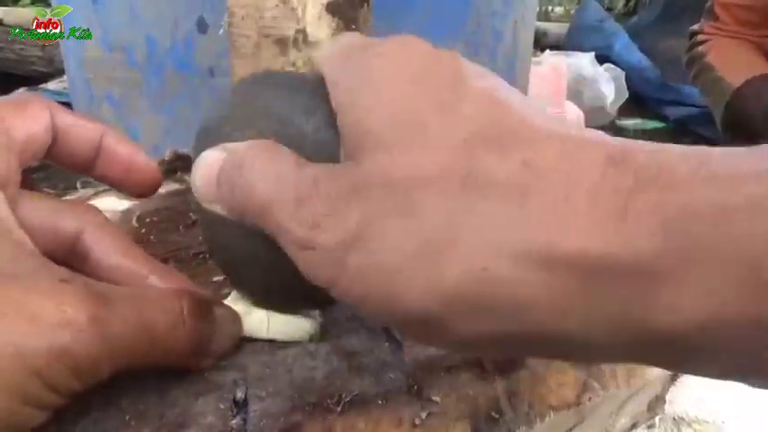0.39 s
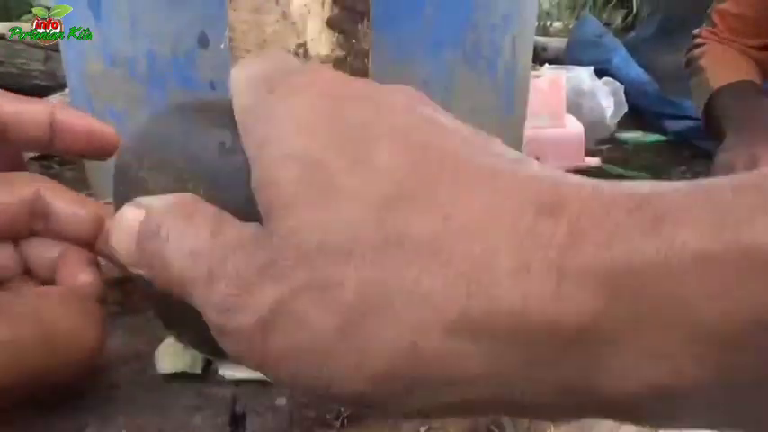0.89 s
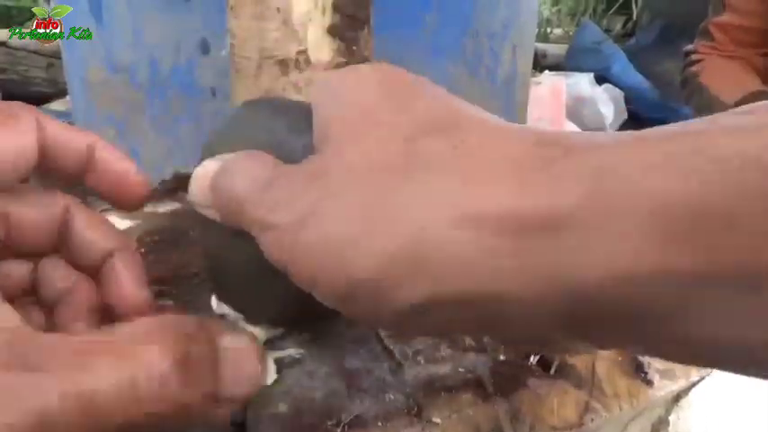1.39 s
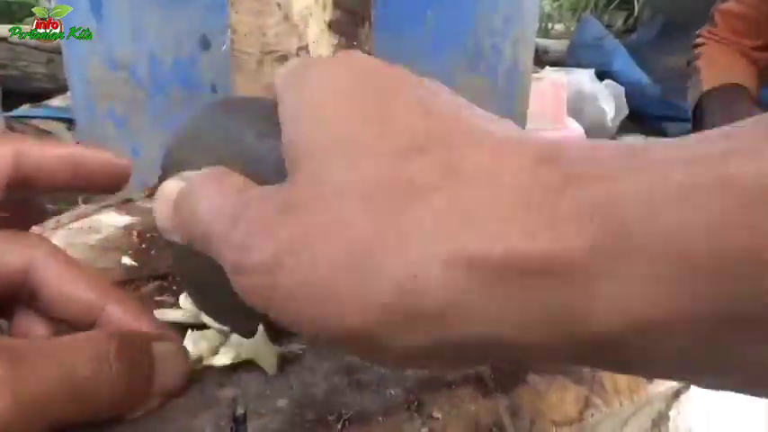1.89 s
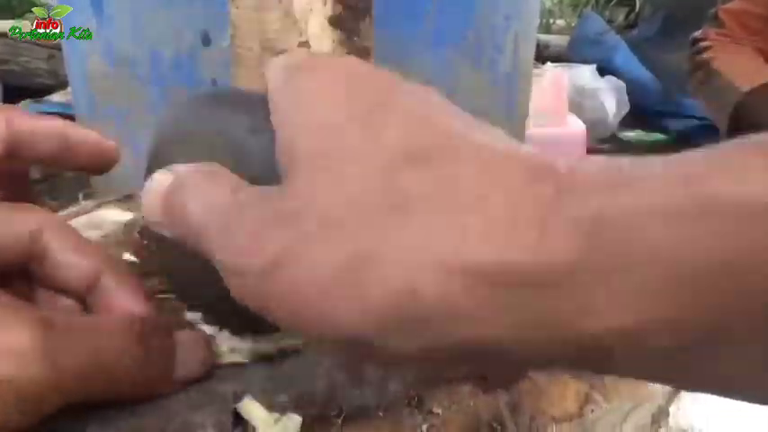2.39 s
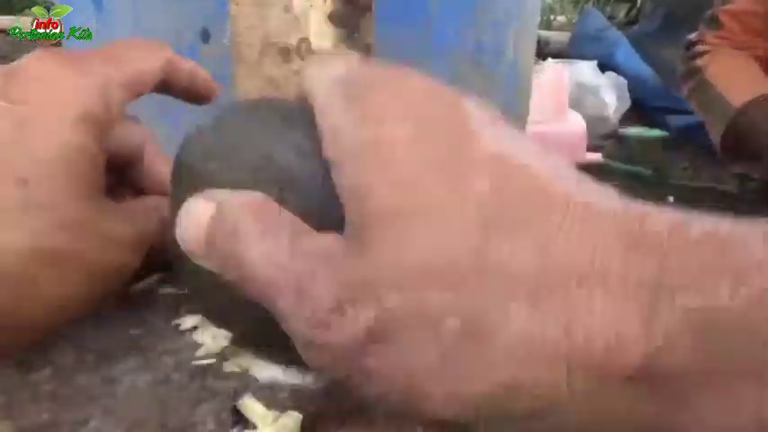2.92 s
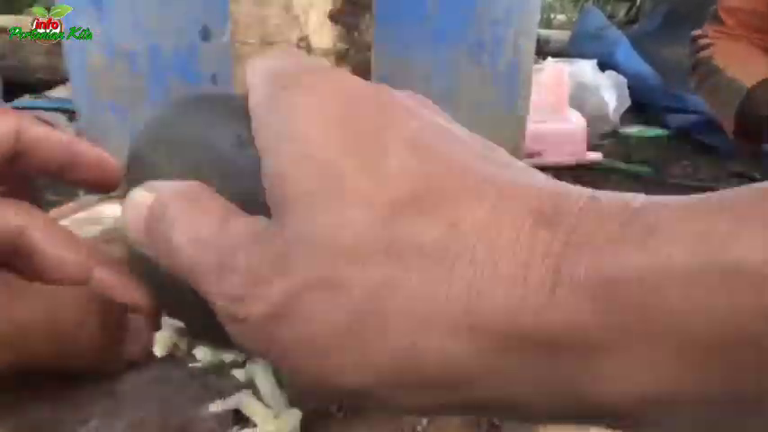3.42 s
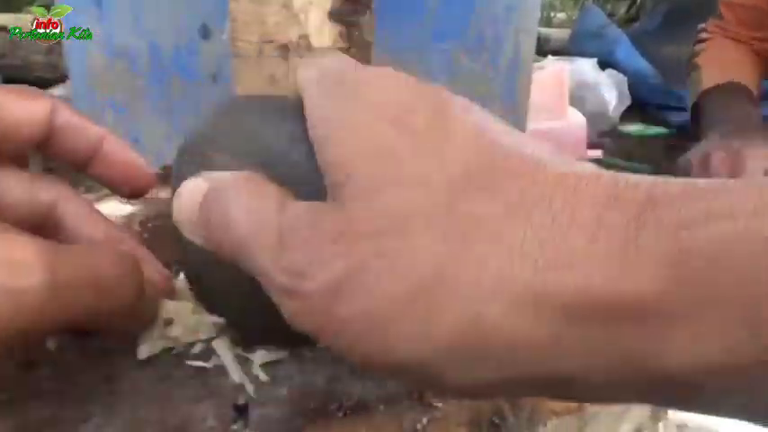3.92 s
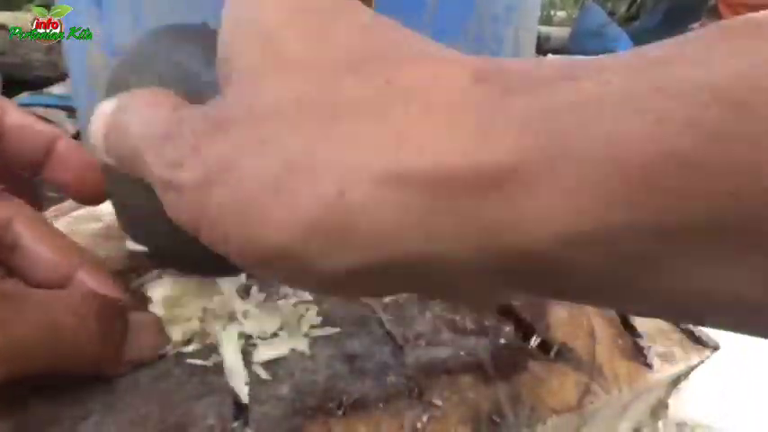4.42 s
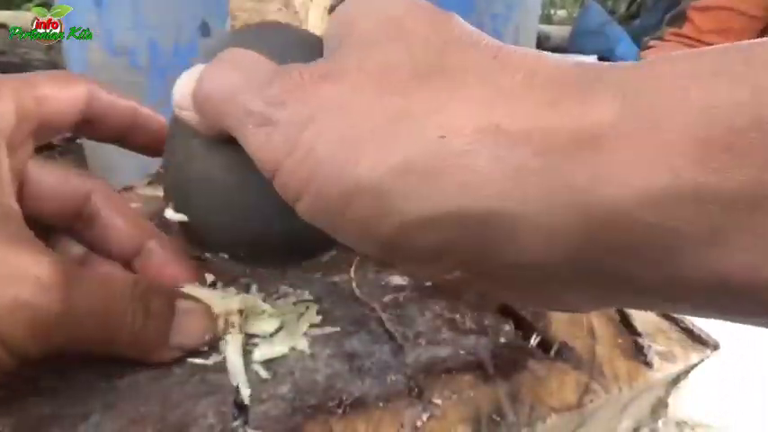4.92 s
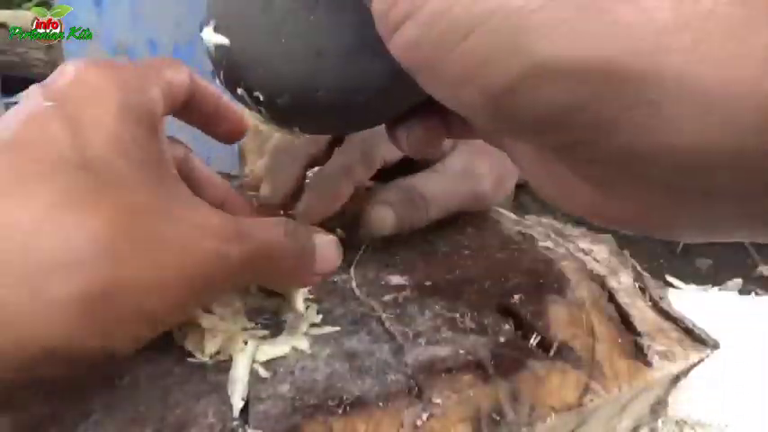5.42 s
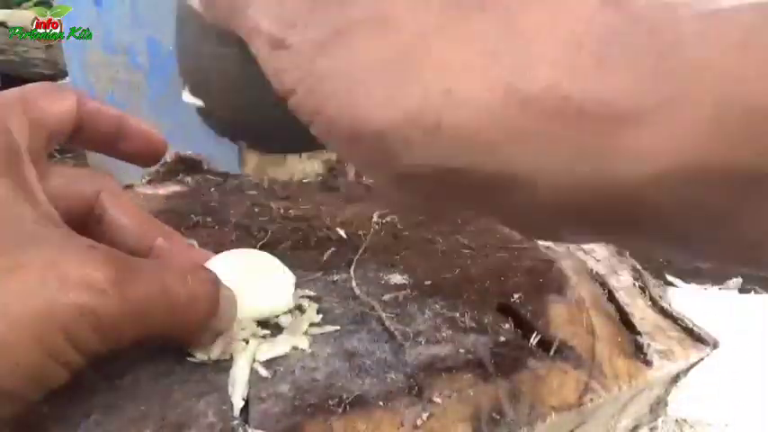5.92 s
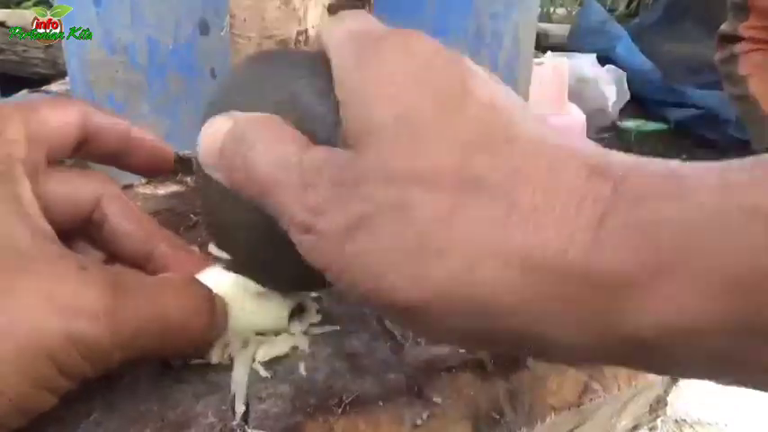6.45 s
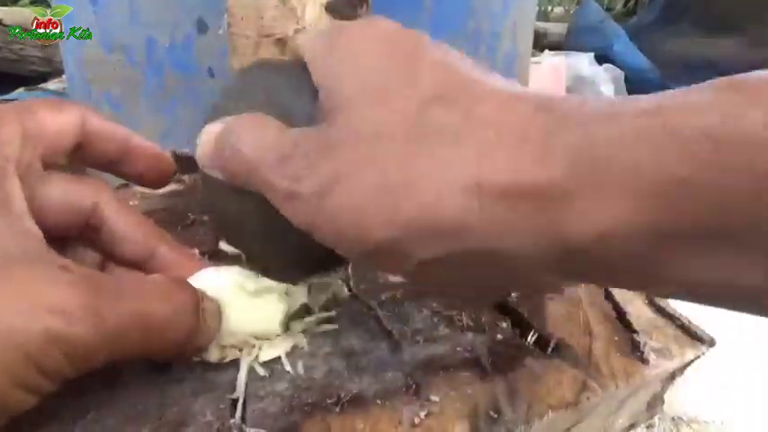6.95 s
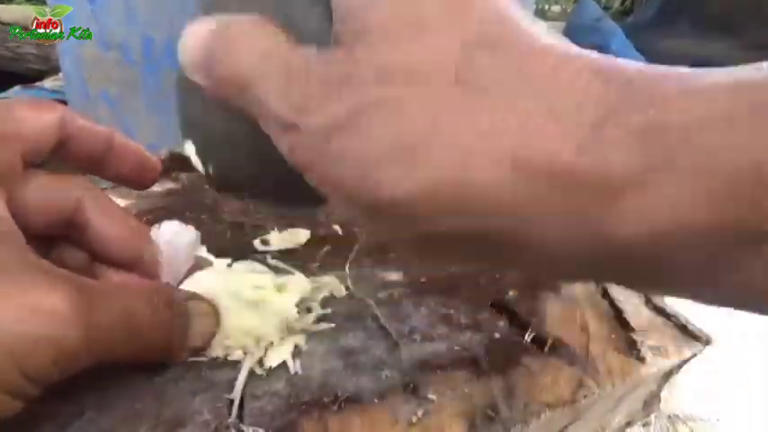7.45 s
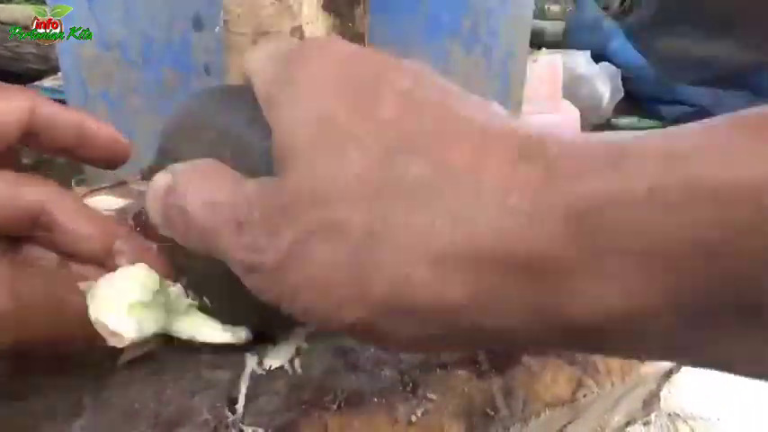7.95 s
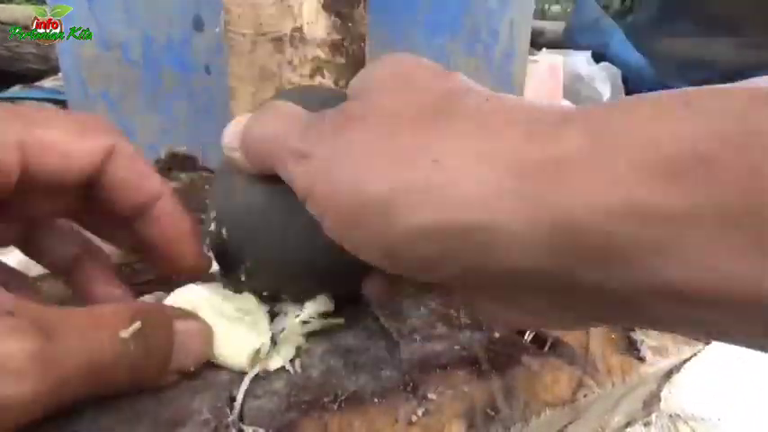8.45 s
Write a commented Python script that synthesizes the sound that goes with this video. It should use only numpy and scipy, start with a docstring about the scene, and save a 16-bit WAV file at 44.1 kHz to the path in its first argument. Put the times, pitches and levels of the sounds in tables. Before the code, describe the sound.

Quick, close stone blows crush garlic cloves on hollow wood, crisp and juicy, with sticky crackles between hits and soft open-air hiss behind.

```python
"""Wet pulp crackles over outdoor hiss and a far wavering hum, then a hand stone pounds garlic on a log.
Each blow is a short bright crunch, dense noise under a swelling envelope, with a slow shudder of the ground.
Knocks of stone on wood are decaying modes; between blows, pulp smears as resonated grains and crackles.
A few faint bird whistles glide in pitch. The level drops out once briefly, and the loudest blows overload."""
import sys
import numpy as np
from scipy import signal
from scipy.fft import rfft, irfft, next_fast_len
from scipy.io import wavfile

SR = 44100
rng = np.random.default_rng(int(sys.argv[2]) if len(sys.argv) > 2 else 0)


def ratio_of_db(decibels):
    """Turn decibels (scalar or array-like) into linear amplitude factors; 0 dB maps to 1."""
    return 10 ** (np.asarray(decibels, float) / 20)


def store_wav(level_fs):
    """Save 16-bit WAV to argv[1]."""
    pcm = np.round(np.clip(np.atleast_2d(level_fs), -1, 1) * 32767)
    wavfile.write(sys.argv[1], SR, pcm.T.astype(np.int16))


N = 378819

# blows on the garlic: peak t/s, crunch level/dB, crush time between -11 dB points/ms,
# relative dullness/dB, drive of the ground shake/dB
BLOWS = [(0.1731, 0, 1.8, -8.5, -33), (.3991, -6, 7.6, -7.5, -25.5), (.574, -0.5, 4.7, -9, -31),
         (0.701, -3.5, 5.5, -7.5, -31), (0.8384, 1, 4.2, -7.5, -29), (0.9778, -2, 4.8, -15, -31.5),
         (1.1388, -10, 4.6, -16, -30.5), (1.275, -6, 5.3, -10.5, -26.5), (1.4126, -6, 6.1, -9.5, -30),
         (1.689, -38, 8, -6, -31.5), (1.8186, 0.5, 2.6, -10.5, -30), (1.944, 1, 2.9, -9.5, -28),
         (2.0767, -3, 3.9, -23, -36), (2.2019, -7, 6, -10, -31.5), (2.477, -17.5, 11, -8, -35),
         (2.604, -19, 5.2, -11.5, -33), (2.716, -32.5, 5.3, -10, -32), (2.8149, -3.5, 4.7, -24, -30),
         (3.0099, -17, 6.1, -13, -30.5), (3.19, -1, 2.7, -19, -29.5), (3.3423, -4.5, 4.8, -15.5, -33.5),
         (3.5069, -8.5, 6.4, -15, -31), (3.6635, -2, 3.7, -30, -34.5), (4.0027, -23, 4.6, -10, -29.5),
         (4.1564, -24.5, 3.6, -8.5, -32.5), (4.2938, -1, 3.4, -17, -32), (4.427, -8.5, 5, -10.5, -28),
         (4.5602, -2, 6.1, -12.5, -36), (4.7074, -15, 7.2, -13.5, -28.5), (5.1031, -9.5, 6.6, -13, -36),
         (5.2144, 1.5, 2.96, -23, -36), (5.9078, -19, 4.5, -4, -31.5), (6.0524, -17, 7.1, -7, -26.5),
         (6.2106, 1, 4.9, -5, -25.5), (6.3538, -13, 7.6, -4, -25), (6.503, 2, 8.7, -5.5, -23),
         (6.657, -10.5, 8, -3.5, -25.5), (6.813, -14, 4.1, -9, -30), (6.9865, 2, 3.2, -6, -37),
         (7.1265, -9, 5.5, -12, -33), (7.311, -14.5, 6.7, -3, -31.5), (7.4577, -18, 2.1, -10, -29.5),
         (7.6057, -5.5, 4.3, -4, -27.5), (7.75, -4, 5.8, -4, -27.5), (8.013, -12, 16, -3.5, -27.5),
         (8.3825, -17.5, 8, -11, -33)]
# spectrum of crushed flesh: f/Hz, relative level/dB
FLESH_SPECTRUM = [(290, -45), (500, -27.5), (1260, -18), (1800, -22.5), (2740, -17), (4210, -10),
                  (6070, -4), (7100, -1), (8990, 2.5), (10700, 0), (11400, 11), (14800, -76), (22000, -120)]


def curve(rows):
    """Linear interpolation in time: the columns of a table, sample by sample."""
    s, *columns = np.transpose(rows)
    return [np.interp(np.arange(N) / SR, s, column) for column in columns]


def at_hz(points, hz):
    """Interpolation of a spectrum on a logarithmic frequency axis."""
    point_hz, value = np.transpose(points)
    return np.interp(np.log(hz + 1), np.log(point_hz), value)


def rms_one(x):
    """Normalisation of the mean power: x scaled to rms 1."""
    return x / np.sqrt(np.mean(x ** 2) + 1e-20)


def coloured(x, spectrum):
    """Zero-phase filtering: the spectrum of x is multiplied by a given magnitude."""
    size = next_fast_len(N)
    gain = ratio_of_db(at_hz(spectrum, np.fft.rfftfreq(size, 1 / SR)))
    return irfft(rfft(x, size) * gain, size)[..., :N]


def drift(rate):
    """Slow random fluctuation, rms 1: noise through two equal low-pass poles at rate Hz."""
    r = np.exp(-80 * np.pi * rate / SR)   # one step spans 40 samples
    noise = rng.standard_normal(N // 40 + 2002)
    slow = signal.lfilter([1], [1, -2 * r, r * r], noise)[2000:]   # start-up left out
    return np.interp(np.arange(N) / 40, np.arange(len(slow)), rms_one(slow))


def ring(force, modes):
    """Modal superposition: a force excites exponentially decaying resonances (f/Hz, gain/dB, T60/s)."""
    out = np.zeros(len(force))
    for hz, gain_db, t60 in modes:
        r = ratio_of_db(-60 / (t60 * SR))   # decay per sample
        w = 2 * np.pi * hz / SR
        poles = [1, -2 * r * np.cos(w), r * r]
        out += ratio_of_db(gain_db) * signal.lfilter([0, np.sin(w)], poles, force + 1e-18)
    return out


def crunches(sharp=1.76, tail_db=-21.5, tail_s=0.0077, split_hz=4000):
    """Fracture noise: dense cracks swell as the clove gives way and fade once it is flat; fibres snap singly."""
    # single fibres snapping around the blows: t/s, level/dB
    snaps = [(0.0572, -27), (0.166, -22), (0.1807, -23), (0.5808, -17), (.8622, -31), (1.1593, -27),
             (1.318, -23.5), (1.406, -19), (3.027, -23), (3.169, -18), (3.1937, -20), (3.3647, -21.5),
             (3.391, -23), (3.8001, -26.5), (3.8755, -27.5), (3.8915, -21), (4.187, -27), (4.439, -17),
             (4.58, -15), (4.6142, -23), (5.11, -28), (5.1414, -22.5), (5.955, -28), (6.0489, -19),
             (6.083, -24.5), (6.3508, -15), (6.377, -26), (6.5158, -15), (6.5644, -25), (6.5717, -24),
             (6.6644, -17), (6.6725, -17), (6.713, -27), (6.982, -10), (7.034, -24.5), (7.147, -31),
             (7.194, -16), (7.21, -31), (7.6004, -8.5), (7.6505, -23), (7.74, -23), (7.81, -27.5),
             (8.003, -21), (8.0155, -5), (8.14, -31)]
    snap_ms, snap_dull_db = 2.2, -9
    rise_share = 0.51   # of the crush time, before the peak

    cracks = rng.standard_normal(N) * ratio_of_db(4.16 * rng.exponential(1, N))
    noise = rms_one(coloured(cracks, FLESH_SPECTRUM))
    low = signal.sosfilt(signal.butter(2, split_hz, fs=SR, output="sos"), noise)
    high = noise - low
    out = np.zeros(N)
    offset = np.arange(-1300, 2600)
    t = offset / SR
    events = [row[:4] for row in BLOWS]
    events += [(s, db, snap_ms, snap_dull_db) for s, db in snaps]
    for s, level_db, crush_ms, dull_db in events:
        width = np.where(t < 0, rise_share, 1 - rise_share) * crush_ms / 1000
        shape = ratio_of_db(-11 * np.abs(t / width) ** sharp)
        shape += ratio_of_db(tail_db) * np.exp(-np.abs(t) / tail_s) * (t > 0)   # juice keeps fizzing
        at = np.clip(round(s * SR) + offset, 0, N - 1)
        tilt_db = dull_db / 2 + 8.0   # a dull crunch has more below the split
        burst = ratio_of_db(tilt_db) * low[at] + ratio_of_db(-tilt_db) * high[at]
        burst /= np.sqrt(np.sum((burst * shape) ** 2) / np.sum(shape ** 2))
        out[at] += ratio_of_db(level_db) * shape * burst
    return out


def knocks():
    """Impact excitation: the slope of a half-sine push rings the damped struck spot and the hollow log."""
    # stone reaching the wood: t/s, push level/dB, log ring relative to the push/dB
    wood_hits = [(.173, -2, -6), (1.278, -28, -30), (1.4121, -13, -28), (1.689, -35.5, -26),
                 (1.82, -4, -25), (1.9449, -6.5, -19), (2.079, -23.5, -39), (2.8139, -2.5, -12),
                 (3.0104, -27, -21), (3.1904, -6, -12.5), (3.665, -7.5, -24.5), (5.2154, -10, -39),
                 (6.2106, -18.5, -28), (6.988, -2, -29.5), (7.1272, -8, -25.5), (8.023, -18.5, -14),
                 (8.3864, -23, -8)]
    # stone skidding on the wood: t/s, level/dB
    skids = [(2.7116, -24), (3.9998, -22.5), (6.8091, -11.5)]
    # the touches within every skid: delay t/s, relative level/dB, log ring relative to the push/dB
    touches = [(0, -1.2, -12), (.0024, -1.5, -13.5), (.0052, -1, -8.5), (.0106, -0.38, -9.5)]
    # damped spot under the stone: f/Hz, gain/dB, T60/s
    struck_spot = [(331, 5.5, 0.017), (629, 9, 0.0079), (1510, 4, 0.012), (160, -29, 0.012)]
    # modes of the hollow log: f/Hz, gain/dB, T60/s
    log_modes = [(417, 7.5, 0.063), (557, 8.5, 0.026), (702, 7, 0.047), (743.5, 7, 0.05), (1042, 3, 0.039),
                 (1240, -9, 0.077), (1443, 9, 0.036), (1750, -17, 0.059), (2090, 1.5, 0.027),
                 (333, -12, 0.17)]
    soft_push_db, soft_ring_db = -28.5, -25.5   # push through the flesh, below the crunch; its log ring
    contact_ms = 0.94
    mode_spread_db = 1.5   # chance per knock and mode
    chatter_db, chatter_s = -27, .007   # ragged contact after the touch

    skid_hits = [(s + lag, db + touch_db, ring_db) for s, db in skids for lag, touch_db, ring_db in touches]
    soft_hits = [(s, db + soft_push_db, soft_ring_db) for s, db, *_ in BLOWS]
    s, level_db, ring_db = np.transpose(wood_hits + skid_hits + soft_hits)
    at = np.round(s * SR).astype(int)

    push = np.sin(np.pi * np.minimum(np.arange(200) / SR * 1000 / contact_ms, 1))
    push_slope = np.diff(push / push.sum(), prepend=0) * SR / 4000

    spot_force = np.zeros(N)
    np.add.at(spot_force, at, ratio_of_db(level_db))
    chance = rng.standard_normal((len(s), len(log_modes)))
    grit = rng.standard_normal(N)
    log_ring = np.zeros(N)
    for mode, own in zip(log_modes, chance.T):
        force = np.zeros(N)
        np.add.at(force, at, ratio_of_db(level_db + ring_db + mode_spread_db * own))
        decay = [1, -np.exp(-1 / (chatter_s * SR))]
        chatter = signal.lfilter([ratio_of_db(chatter_db)], decay, force + 1e-18) * grit
        log_ring += ring(force + chatter, [mode])
    return signal.lfilter(push_slope, 1, ring(spot_force, struck_spot) + log_ring)


def thumps():
    """Low-frequency modal response: a smoothed downward impulse per blow makes the ground shudder."""
    # modes of the ground: f/Hz, gain/dB, T60/s
    ground = [(71, 5.5, 0.14), (45.2, -26, 0.12), (138, -3.5, 0.04)]
    lag_s, rise_s = -0.0011, 0.0013   # from the crunch peak; build-up time constant
    force = np.zeros(N)
    for s, *_, shake_db in BLOWS:
        force[round((s + lag_s) * SR)] = -ratio_of_db(shake_db)   # starts with a drop in pressure
    r = np.exp(-1 / (rise_s * SR))
    smooth = signal.lfilter([(1 - r) ** 2], [1, -2 * r, r * r], force + 1e-18)
    return ring(smooth, ground)


def smears(per_s=6900.0):
    """Resonated grain noise: wet grains fizz as the stone slides and ring in an air pocket."""
    # pulp smeared under the stone: start t/s, length/s, fizz level/dB, pocket f/Hz, pocket relative to fizz/dB
    slides = [(0.795, 0.053, -38, 5000, -4), (1.685, 0.059, -41, 5030, -3), (3.083, 0.029, -45, 5340, -2),
              (3.116, 0.038, -34.5, 2400, -11), (3.873, 0.043, -40, 2200, -18),
              (4.496, 0.03, -35, 2300, -1), (4.523, 0.025, -33, 5200, 1), (6.05, 0.029, -36.5, 3060, -8.5),
              (7.457, 0.019, -33.5, 4900, -6.5)]
    # resonances of the fizz: f/Hz, gain/dB, T60/s
    fizz_modes = [(7860, 13, 0.0022), (9000, 6, .001)]
    edge_s, pocket_t60_s = 0.0023, 0.0033
    grains = (rng.random(N) < per_s / SR) * rng.standard_normal(N) * ratio_of_db(1.45 * rng.exponential(1, N))
    grains = np.diff(grains, prepend=0)
    fizz = rms_one(ring(grains, fizz_modes))
    out = np.zeros(N)
    for s, length_s, level_db, hz, pocket_db in slides:
        t = np.arange(-500, round(length_s * SR) + 500) / SR
        at = np.round((s + t) * SR).astype(int)
        pocket_modes = [(hz, 0, pocket_t60_s), (hz * 1.31, -6, pocket_t60_s)]
        pocket = rms_one(ring(grains[at], pocket_modes))
        envelope = np.clip(np.minimum(t, length_s - t) / edge_s + .5, 0, 1)
        out[at] += ratio_of_db(level_db) * envelope * (fizz[at] + ratio_of_db(pocket_db) * pocket)
    return out


def pulp(per_s=2500.):
    """Random impulse process: tiny sticky clicks whose fluctuating rate gathers them in clumps."""
    # sticky pulp: t/s, level before a common 2 dB lift/dB
    pulp_level = [(0.0, -46), (0.16, -50.5), (1.87, -50), (2.1, -53.5), (2.68, -54), (2.82, -63),
                  (3.61, -52), (3.73, -50), (4.26, -52), (4.55, -47), (5.55, -61), (6.72, -51),
                  (7.29, -52.5), (7.73, -49), (8.59, -53)]
    born = rng.random(N) < per_s * ratio_of_db(4.0 * drift(25)) / SR
    clicks = born * rng.standard_normal(N) * ratio_of_db(2.7 * rng.exponential(1, N))
    return ratio_of_db(curve(pulp_level)[0] + 2.0) * rms_one(coloured(clicks, FLESH_SPECTRUM))


def hum():
    """Frequency and amplitude modulation: a low tone and its octave waver in pitch and throb."""
    # far hum: t/s, mean f/Hz, mean level of the fundamental's peak/dB
    hum_course = [(0, 121, -47.5), (3.9, 120.9, -59), (4.7, 118, -50), (5.3, 118, -62), (6.4, 118, -48),
                  (7.8, 104.4, -46), (8.3, 124, -45.5), (8.59, 124, -57)]
    hz, level_db = curve(hum_course)
    phase = 2 * np.pi * np.cumsum(hz * (1 + 0.03935 * drift(12.64))) / SR
    return ratio_of_db(level_db + 3.5 * drift(15.0)) * (np.sin(phase) + 0.2 * np.sin(2 * phase))


def bird(length_s=0.012, arch_hz=250., throb_db=4.):
    """Frequency glide under a Gaussian envelope: short faint whistles arch in pitch and flutter in level."""
    # a far bird: centre t/s, highest f/Hz, level before flutter/dB
    chirps = [(7.165, 3150, -43), (7.204, 3200, -49), (7.235, 3180, -39), (7.258, 3100, -48),
              (7.279, 3430, -44), (7.861, 1720, -42.5)]
    out = np.zeros(N)
    t = np.arange(-1200, 1200) / SR
    throb = drift(90)
    for s, hz, level_db in chirps:
        at = np.round((s + t) * SR).astype(int)
        phase = 2 * np.pi * np.cumsum(hz - arch_hz * (t / length_s) ** 2 / 2) / SR
        level = ratio_of_db(level_db + throb_db * throb[at])
        out[at] += level * np.exp(-(t / length_s) ** 2) * np.sin(phase)
    return out


def field():
    """Partial coherence: outdoor hiss mixes a common and an opposed noise into the two sides."""
    # spectrum of the hiss: f/Hz, relative level/dB
    hiss_spectrum = [(18, -59), (30, -17), (112, -1.5), (248, -10), (670, -15), (1250, -17.5),
                     (1720, -17.5), (3810, -21.5), (5010, -18), (6260, -23.5), (9320, -26), (10600, -20.5),
                     (11400, -8), (14800, -74.5), (22000, -120)]
    # likeness of left and right: f/Hz, correlation (1 = identical)
    likeness = [(60, 0.98), (170, 0.97), (480, 0.19), (1360, 0.043), (3860, 0.54), (10900, 0.52)]
    hiss_db = -41.5   # rms
    size = next_fast_len(N)
    hz = np.fft.rfftfreq(size, 1 / SR)
    mid, side = rfft(rng.standard_normal((2, size)))
    alike = np.clip(at_hz(likeness, hz), -1, 1)
    both = np.sqrt(1 + alike) * mid + np.sqrt(1 - alike) * side * [[1], [-1]]
    hiss = irfft(ratio_of_db(at_hz(hiss_spectrum, hz)) * both, size)[:, :N]
    return ratio_of_db(hiss_db + 0.38 * drift(11.0)) * rms_one(hiss)


def two_ports(x, left_db=0.4):
    """Interaural-style phase difference: sound leads at the left port, which is raised as the right is lowered."""
    # lead of left over right: f/Hz, phase/rad
    left_lead = [(60, 0.056), (520, 0.67), (1200, 1.), (2400, 0.7), (4500, 0.62), (8000, 0.3),
                 (11000, 0.36)]
    size = next_fast_len(N)
    half_lead = at_hz(left_lead, np.fft.rfftfreq(size, 1 / SR)) / 2
    sides = np.array([[1], [-1]])
    return irfft(rfft(x, size) * np.exp(1j * half_lead * sides), size)[:, :N] * ratio_of_db(left_db * sides)


def scene():
    """Linear superposition: all sources but the hiss pass the two ports, and the field is added."""
    blows = crunches() + knocks() + thumps()
    wet = smears() + pulp()
    far = hum() + bird()
    return two_ports(blows + wet + far) + field()


def top_cut(x):
    """Nothing passes above the cut-off."""
    return signal.sosfilt(signal.butter(12, 11520, fs=SR, output="sos"), x)


def record(dry):
    """Band limiting, then saturation: the top is cut, the level drops out once, and peaks clip smoothly."""
    stop_hz = 11995   # 60 dB down from here
    dropout_start_s, dropout_end_s, dropout_db = .511, .527, -50
    x = signal.sosfilt(signal.cheby2(10, 60, stop_hz, fs=SR, output="sos"), dry)
    t = np.arange(N) / SR
    x = x * np.where((t > dropout_start_s) & (t < dropout_end_s), ratio_of_db(dropout_db), 1)
    x = x / (1 + np.abs(x) ** 8.0) ** (1 / 8)   # overload
    return top_cut(x)


dry = scene()
out = record(dry)
store_wav(out)
```